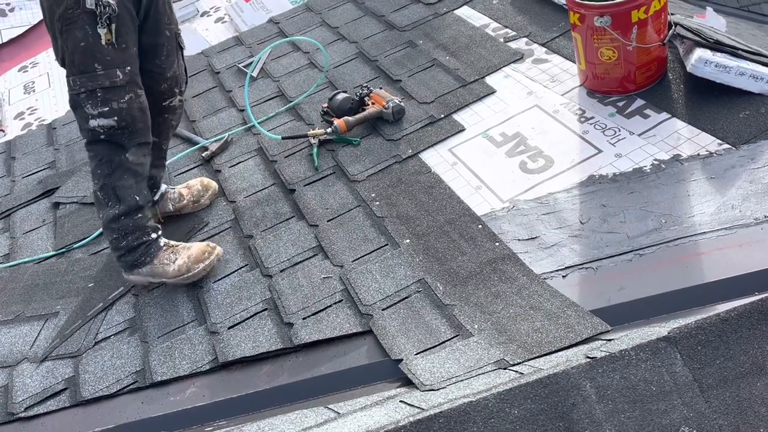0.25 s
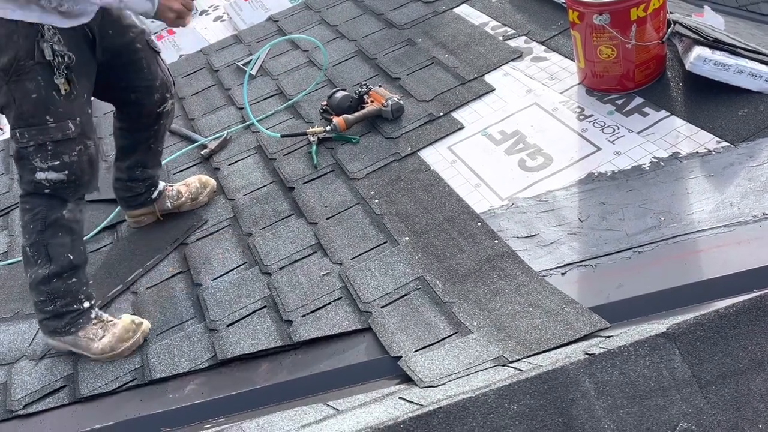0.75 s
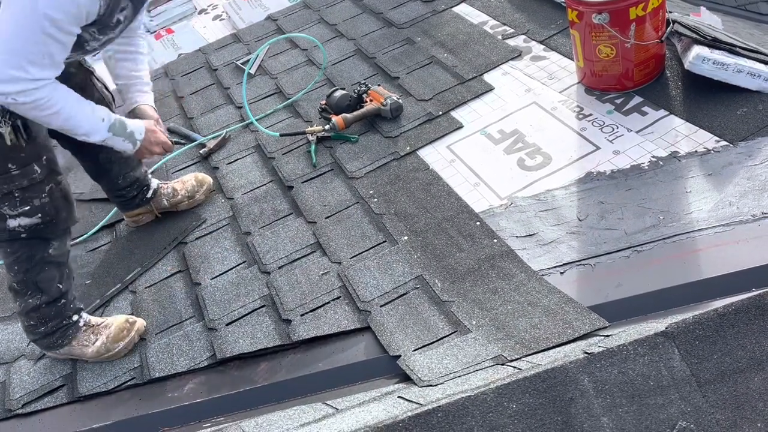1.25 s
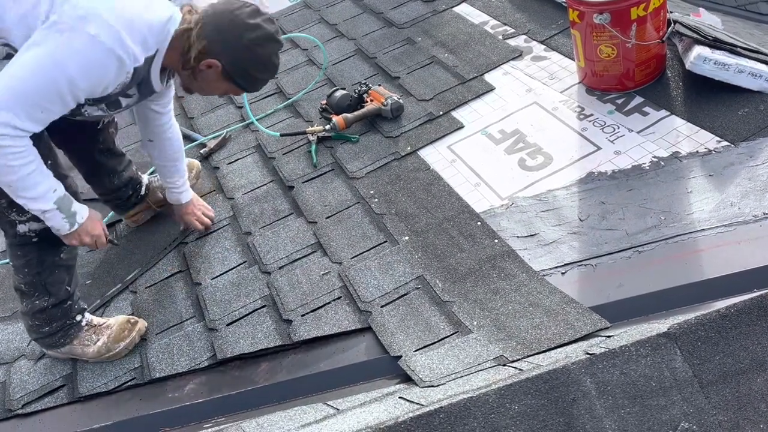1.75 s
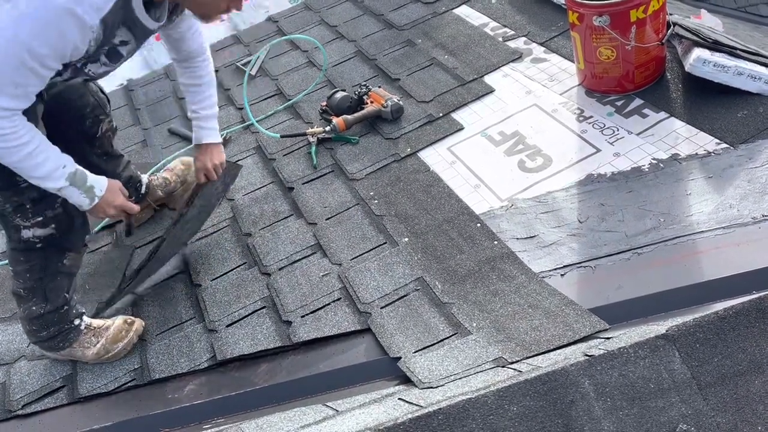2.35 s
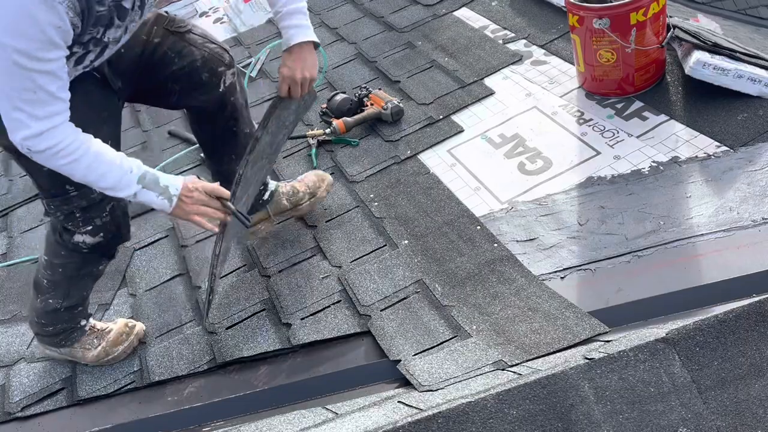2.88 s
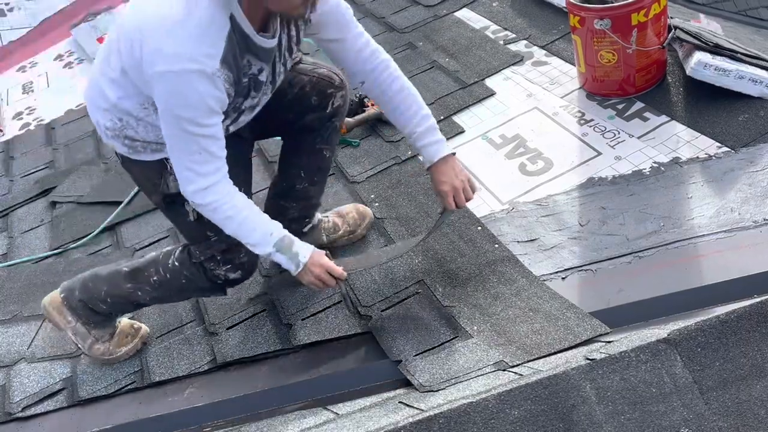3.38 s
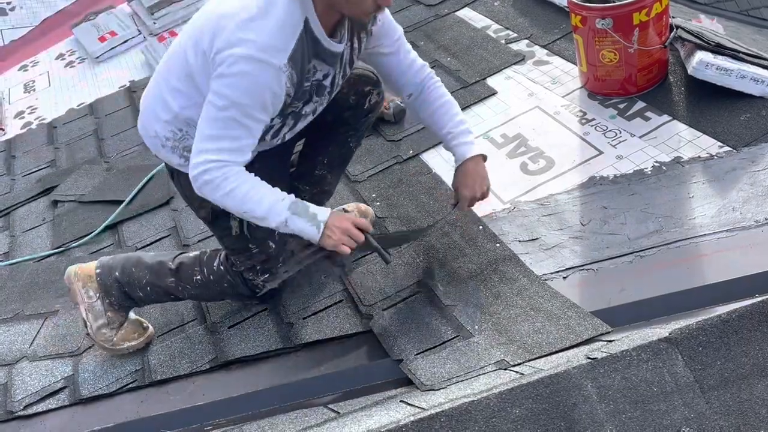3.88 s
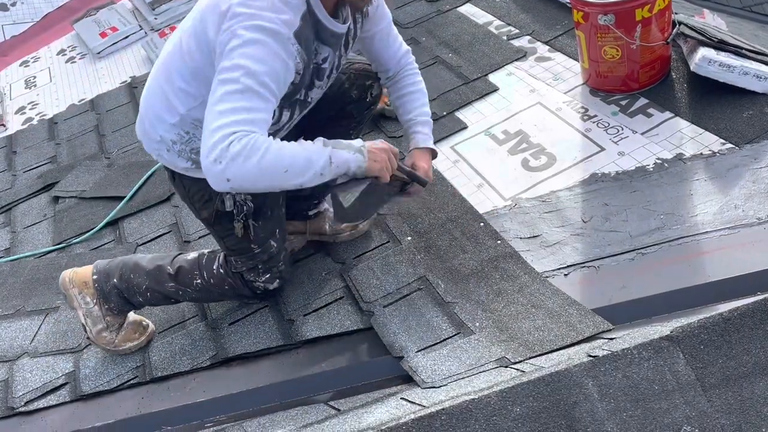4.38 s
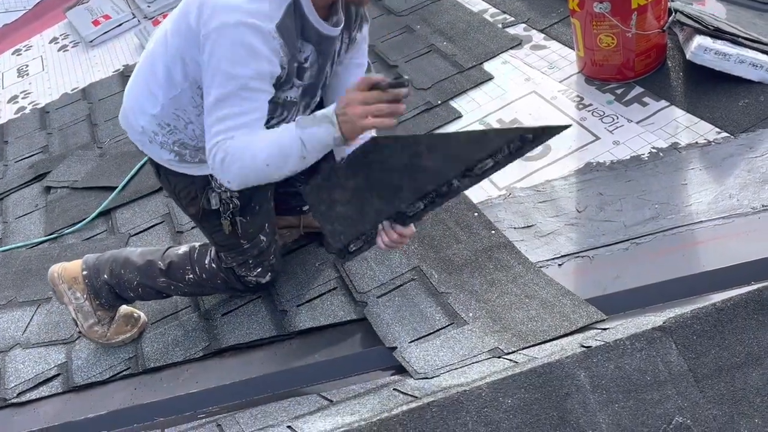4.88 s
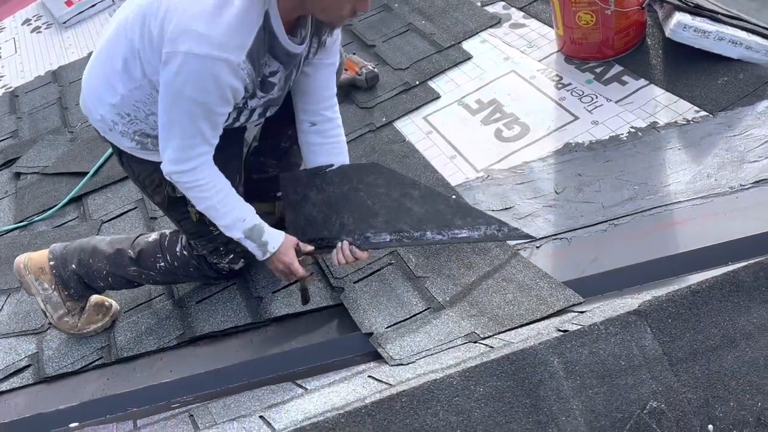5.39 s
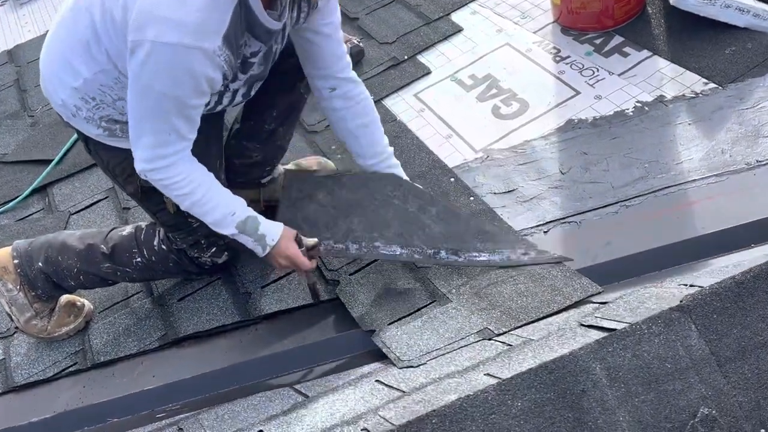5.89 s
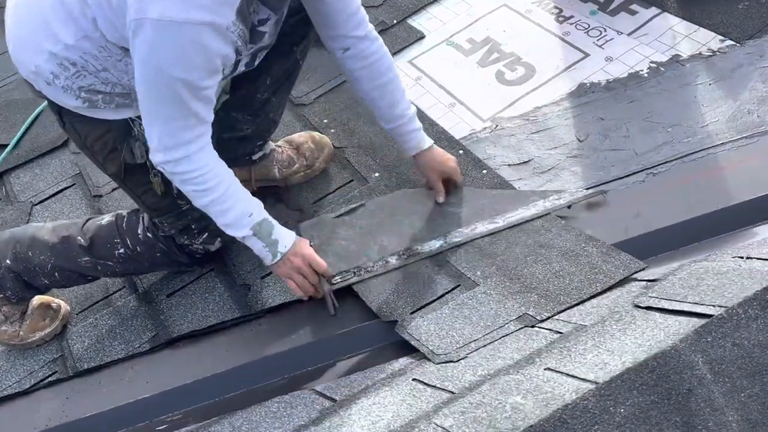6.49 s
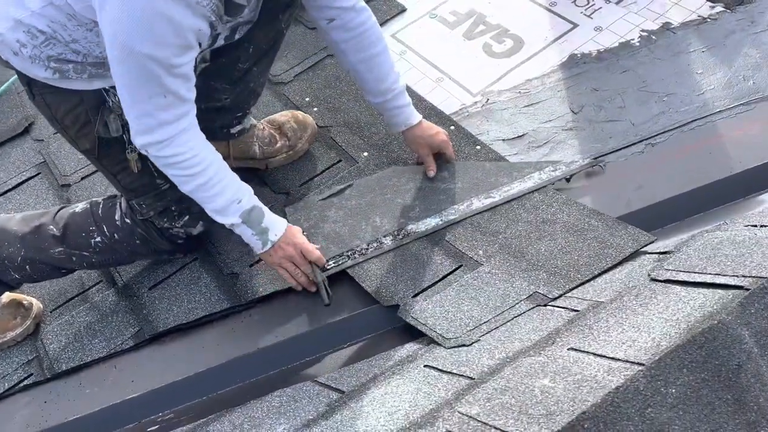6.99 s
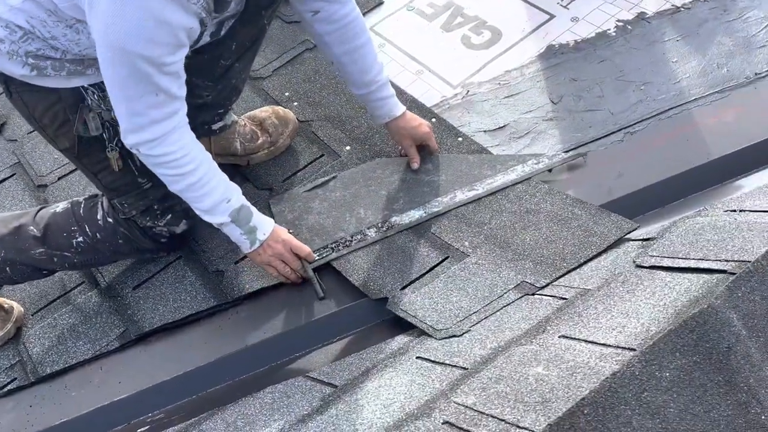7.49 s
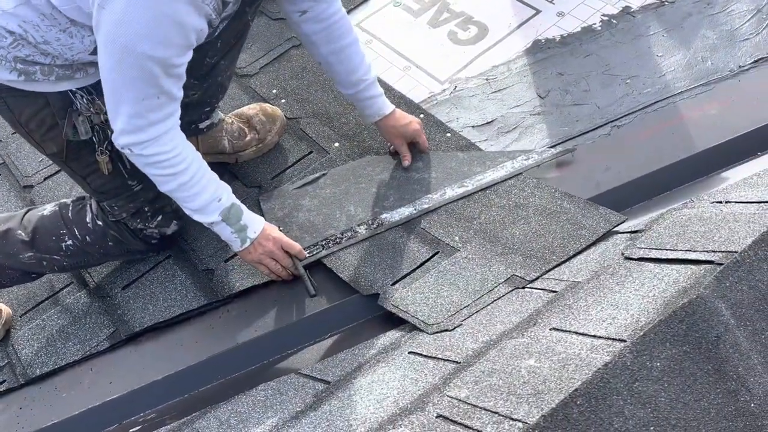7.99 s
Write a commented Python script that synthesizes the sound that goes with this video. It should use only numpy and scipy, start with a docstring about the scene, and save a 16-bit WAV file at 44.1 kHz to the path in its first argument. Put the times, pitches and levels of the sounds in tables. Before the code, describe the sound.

A pneumatic nailer fires six sharp, deck-ringing shots on a windy shingled roof, with air hisses, a brief knife rasp and gritty boot scuffs.

```python
"""Wind buffets a small stereo microphone on a shingled roof while a roofer shifts and scuffs close by.
Then a pneumatic nailer fires the first of six shots: clicks, blows that ring the deck, hissing air.
After the first shot a knife rasps through a shingle; boots, grit and wind go on between the later shots.
Struck things are ringing tones and short noise bursts; air, rubbing and wind are coloured noise.
At the end of the chain a gain control sinks after loud sounds and a limiter holds the peaks."""
import sys
import numpy as np
from scipy import signal
from scipy.fft import rfft, irfft
from scipy.io import wavfile
from scipy.ndimage import uniform_filter1d, minimum_filter1d

SR = 44100
rng = np.random.default_rng(int(sys.argv[2]) if len(sys.argv) > 2 else 0)


def store_pcm(level_fs):
    """Save levels as 16-bit WAV."""
    pcm = np.round(np.clip(level_fs, -1, 1) * 32767).astype(np.int16)
    wavfile.write(sys.argv[1], SR, np.atleast_2d(pcm).T)


N = 363825
TIME = np.arange(N) / SR  # s
BINS = np.fft.rfftfreq(N, 1 / SR)  # Hz

# Table levels are relative: each function adds its own gains. A t60 is the time to fade by 60 dB, in s.
# Two-row signals hold the part both microphone ports share, then the part in which they differ.


def from_db(db):
    """Decibels to gain."""
    return 10 ** (np.asarray(db) / 20)


def rms_one(x):
    """Scale to an rms of 1."""
    return x / np.sqrt(np.mean(x ** 2) + 1e-20)


def in_time(rows):
    """Join the points of each column by straight lines, giving a value at every sample."""
    s, *columns = np.transpose(rows)
    return [np.interp(TIME, s, column) for column in columns]


def over_bins(points):
    """Read a table along log frequency."""
    hz, value = np.transpose(points)
    return np.interp(np.log(BINS + 1), np.log(hz), value)


def noise(colour):
    """Two unrelated noises with the given spectrum: the shared part and the differing part."""
    white = rng.standard_normal((2, N))
    return rms_one(irfft(rfft(white) * from_db(over_bins(colour)), N))


def resonant(x, hz, width_hz):
    """Noise through one broad resonance, with an rms of 1."""
    b, a = signal.iirpeak(hz, hz / width_hz, fs=SR)
    return rms_one(signal.lfilter(b, a, x))


def flutter(rate_hz, depth_db):
    """A gain that wanders at random, with a mean power of 1."""
    slow = irfft(rfft(rng.standard_normal(N)) / (1 + (BINS / rate_hz) ** 2), N)
    return rms_one(from_db(depth_db * np.clip(rms_one(slow), -2, 2)))


def gritty(per_s, size_db, t60):
    """The gain of many tiny scratches of uneven size, with a mean power of 1."""
    born = rng.random(N) < per_s / SR
    sizes = from_db(size_db * np.minimum(rng.exponential(1, N), 4))
    power = fading(born * sizes ** 2, t60 / 2)
    return rms_one(np.sqrt(power))


def clicks(times, db):
    """One impulse per event."""
    out = np.zeros(N)
    np.add.at(out, np.round(times * SR).astype(int), from_db(db))
    return out


def fading(x, t60):
    """Every impulse becomes an exponential decay of its own height."""
    return signal.lfilter([1], [1, -from_db(-60 / (t60 * SR))], x + 1e-18)


def burst(x, t60, rise_t60):
    """A decay that takes a moment to swell."""
    return fading(x, t60) - fading(x, rise_t60)


def ring(x, hz, t60):
    """A unit impulse sets a decaying sine ringing, with a starting height of 1."""
    r = from_db(-60 / (t60 * SR))
    w = 2 * np.pi * hz / SR
    return signal.lfilter([0, r * np.sin(w)], [1, -2 * r * np.cos(w), r * r], x + 1e-18)


def swells(rows, fade_share, edge_db):
    """Summed power of events that swell and fade; fade_share of the length fades, ends lie edge_db down."""
    power = np.zeros(N)
    for s, db, length in rows:
        near = slice(*np.searchsorted(TIME, [s - 4 * length, s + 4 * length]))
        along = (TIME[near] - s) / length
        # after the peak the first slope counts, before it the second
        drop = np.maximum(along / fade_share, -along / (1 - fade_share))
        power[near] += from_db(db - edge_db * drop) ** 2
    return power


def nailer(gain_db=-2.5):
    """Trigger, blows, valve, exhaust and recoil add up, then scatter off the roofs and echo."""
    struck = blows() + struck_spots() + crush() + tool_ring()
    recoiling = recoil()
    shot = from_db(gain_db) * (trigger() + struck + valve() + exhaust() + recoiling)
    return shot + rooftops(shot) + house_echo(shot)


# piston, nail and nose strike, three or more blows a shot:
# t/s, level/dB, deck thump level/dB, steel crack level/dB, pitch the struck spot favours f/Hz
BLOWS = [(1.839, 2, 0, -1.5, 1088), (1.8475, -5.5, -1, 0.5, 1330), (1.855, -3, -8, -6, 1030),
         (2.753, -1, 7.5, 6.5, 573), (2.761, 4, -2, -0.5, 1684), (2.765, 8, -1, -2, 1853),
         (3.756, -3.5, 8, 5.5, 540), (3.7638, 5, -14.5, 1.5, 1287), (3.7682, 6.5, -5, -2, 1830),
         (4.981, -7.5, 6.5, 8, 350), (4.9891, 3, -3.5, -0.5, 807), (4.9941, 7, -9, -7.5, 1400),
         (6.9145, -2, 0, 6, 577), (6.9226, 0.5, -2.5, 6, 1370), (6.929, -4, -18, 3, 798),
         (6.939, -8, 4, -10.5, 706), (6.9527, -2, -8, -9, 790), (7.7961, 0, -1, 6, 880),
         (7.8045, -3, -5, 6, 560), (7.8086, 4, -15, -4, 1050)]
# spectrum of the rattling shingles: f/Hz, level/dB per Hz
KNOCK_COLOUR = [(50, -21.5), (150, 5.5), (300, -5.5), (550, 10.5), (900, 0.5), (1500, 10), (1900, -6),
                (3200, -13.5), (6000, -21.5), (16000, -53)]
# spectrum of steel on steel: f/Hz, level/dB per Hz
CRACK_COLOUR = [(300, -5), (1500, 4), (3000, 1.5), (5000, -2.5), (8000, -2), (11500, 0), (16000, -8.5)]


def blows(deck_db=-0.5, spot_db=2, spot_octaves=0.49, knock_db=-8, crack_db=-4.5):
    """Each blow rings the deck, rattles the shingles, and cracks steel on steel."""
    s, db, thump, crack, spot_hz = np.transpose(BLOWS)

    def strength_db(hz):
        low_thump = thump / (1 + (hz / 420) ** 4)
        favoured = spot_db * np.exp(-(np.log2(hz / spot_hz) / spot_octaves) ** 2)
        return db + deck_db + low_thump + favoured

    boom = deck(s, strength_db)
    knock = burst(clicks(s, db + knock_db), t60=0.028, rise_t60=0.0085) * noise(KNOCK_COLOUR)
    snap = burst(clicks(s, db + crack + crack_db), t60=0.017, rise_t60=0.0085) * noise(CRACK_COLOUR)
    return boom + (knock + snap) * gritty(per_s=2400, size_db=2.0, t60=0.0035)


def struck_spots(gain_db=-8, cycles=15):
    """The spot under the nose rings for a few cycles at its own pitch and gives each blow its hard core."""
    out, t = np.zeros((2, N)), TIME[:SR // 10]
    for s, db, _, _, hz in BLOWS:
        start = int(s * SR)
        fade = from_db(db + gain_db - 60 * hz * t / cycles)  # 60 dB down after that many cycles
        out[0, start:start + len(t)] += fade * np.sin(2 * np.pi * hz * t)
    return out


# spectrum of the crunching shingle: f/Hz, level/dB per Hz
CRUSH_COLOUR = [(300, -17), (900, 8), (1500, 11.5), (2200, 1.5), (3500, -5.5), (6000, -10.5), (9000, -25),
                (16000, -49)]


def crush(gain_db=-12, length_s=0.0052, edge_db=16):
    """Around each blow the shingle crunches, in a very short burst of noise."""
    rows = [(s + length_s / 6, db + gain_db, length_s) for s, db, *_ in BLOWS]
    return np.sqrt(swells(rows, 0.9, edge_db)) * noise(CRUSH_COLOUR)


# what the roof deck rings with: f/Hz, level/dB, t60/s
DECK = [(128, -33, 0.77), (124.3, -14.5, 0.2), (185.3, -11.5, 0.062), (260, -8.5, 0.054),
        (343.2, -10.5, 0.067), (448, -15.5, 0.051), (573, -15.5, 0.048), (681, -15.5, 0.039),
        (771, -18, 0.073), (869, -13, 0.026), (1074, -19.5, 0.027), (1218, -17.5, 0.037),
        (1350, -9.5, 0.021), (1690, -33, 0.029), (2370, -21, 0.023)]


def deck(times, strength_db, spread_db=3.0):
    """Blows ring the deck's modes; strength_db(hz) says how hard each blow drives a mode."""
    chance = rng.standard_normal((len(times), len(DECK)))
    out = np.zeros((2, N))
    for k, (hz, db, t60) in enumerate(DECK):
        struck = clicks(times, strength_db(hz) + db + spread_db * chance[:, k])
        mode = ring(struck, hz, t60)
        quarter_cycle = int(SR / hz / 4)
        # signs alternate, so each mode reaches the ports from its own direction
        out[0] += (-1) ** k * mode
        out[1] += (-1) ** (k // 2) * np.roll(mode, quarter_cycle)
    return out


# exhaust puffs: t/s, level/dB, time until the flow runs down t/s, low blast level/dB,
# centre of the port's hiss f/Hz, port hiss level/dB
EXHAUST = [(1.881, -23, 0.022, 1.5, 6900, -2), (2.77, -24, 0.0082, 6.5, 4000, 2),
           (2.837, -7.5, 0.019, -3, 5170, -9.5), (3.786, -19, 0.017, 1, 4900, -3.5),
           (5.009, -11, 0.014, -1, 4800, -7), (6.942, -10.5, 0.019, -2, 6370, -12),
           (7.82, -16.5, 0.016, -7, 6800, -5.5)]
# spectrum of the hissing jet: f/Hz, level/dB per Hz
VENT_COLOUR = [(200, -9), (700, -6.5), (1200, -9.5), (2000, -3), (3500, 1.5), (5000, -1.5), (7000, 0.5),
               (10000, 3), (13500, -.5), (16000, -12.5)]
# spectrum of the low blast: f/Hz, level/dB per Hz
BLAST_COLOUR = [(30, -18), (90, -1.5), (150, 1), (250, -3.5), (400, -25.5), (780, -22), (1100, -20),
                (3000, -48.5)]


def exhaust(opening_s=0.0061, emptying_t60=0.071, blast_t60=0.12, port_width_hz=1200):
    """The port opens and hisses, the cylinder blows out at full flow, then runs empty, sputtering."""
    out, t = np.zeros((2, N)), TIME[:SR // 3]
    jet, blast = noise(VENT_COLOUR), noise(BLAST_COLOUR)
    sputter = flutter(rate_hz=130, depth_db=1.7)
    for s, db, hold, low_db, port_hz, port_db in EXHAUST:
        puff = slice(int(s * SR), int(s * SR) + len(t))
        opened = from_db(db) * np.minimum(t / opening_s, 1)
        emptying = np.maximum(t - hold, 0)
        port = resonant(rng.standard_normal((2, len(t))), port_hz, port_width_hz)
        hiss = (jet[:, puff] + from_db(port_db) * port) * sputter[puff]
        hiss_fade = from_db(-60 * emptying / emptying_t60)
        blast_fade = from_db(low_db - 60 * emptying / blast_t60)
        out[:, puff] += opened * (hiss_fade * hiss + blast_fade * blast[:, puff])
    return out


# the piston returns and the tool bounces on the deck:
# t/s, level/dB, fall (negative) or rise towards the high modes in dB per octave
RECOIL = [(1.917, -12.5, -8), (2.869, -1, -1), (3.817, -15, -0.5), (5.037, -8, -1), (6.949, -8.5, 2.5),
          (7.822, 5.5, -31.5)]


def recoil():
    """Returning piston and bouncing tool bump the deck after each shot."""
    return thuds(RECOIL, gain_db=-3.0, slap_db=-5.5, slap_t60=0.042)


# spectrum of shingles slapped down: f/Hz, level/dB per Hz
THUD_COLOUR = [(80, -16), (200, 10.5), (330, 13.5), (650, 8.5), (900, -21), (1600, -34.5), (4000, -54)]


def thuds(rows, gain_db, slap_db, slap_t60):
    """Soft contacts reach mostly the deck's low modes; firmer ones also slap the shingles down."""
    s, db, fall_db = np.transpose(rows)
    slap = burst(clicks(s, db + fall_db + slap_db), slap_t60, slap_t60 / 6) * noise(THUD_COLOUR)
    return slap + deck(s, lambda hz: db + gain_db + fall_db * max(np.log2(hz / 250), 0))


# the main valve snaps shut before venting: t/s, level/dB
VALVE = [(1.875, -16), (2.8301, 1), (6.938, -5)]
# spectrum of the valve's snap: f/Hz, level/dB per Hz
VALVE_COLOUR = [(500, -22.5), (1500, -1.5), (2400, 3), (3500, -6.5), (5500, -8), (7500, -33.5),
                (16000, -33)]


def valve(gain_db=3):
    """A short bright snap of air."""
    s, db = np.transpose(VALVE)
    return burst(clicks(s, db + gain_db), t60=0.014, rise_t60=0.007) * noise(VALVE_COLOUR)


# what the nailer's metal body rings with: f/Hz, level/dB, t60/s
TOOL_BODY = [(2000, -48, .09), (2590, -39.5, 0.23), (3210, -28.5, 0.055), (3430, -35, 0.067),
             (4460, -31, 0.036), (12400, -54, 0.27), (12700, -51, 0.27)]


def tool_ring(blow_db=-5, valve_db=3, spread_db=3):
    """The blows and the closing valve set the nailer's body ringing."""
    hits = [(s, db + blow_db) for s, db, *_ in BLOWS] + [(s, db + valve_db) for s, db in VALVE]
    s, db = np.transpose(hits)
    chance = rng.standard_normal((len(s), len(TOOL_BODY)))
    out = np.zeros(N)
    for k, (hz, mode_db, t60) in enumerate(TOOL_BODY):
        out += ring(clicks(s, db + mode_db + spread_db * chance[:, k]), hz, t60)
    return np.array([out, np.roll(out, SR // 500)])  # the differing part comes 2 ms later


# the nose and the trigger click ahead of every shot: t/s, level/dB, treble level/dB relative to the click
TRIGGERS = [(1.8175, -22.5, -26), (1.826, -17.5, -9.5), (2.738, -18.5, -25), (2.743, -12.5, -25),
            (3.738, -28.5, -24), (3.7435, -16, -17), (4.963, -20.5, -31), (4.971, -17.5, -18),
            (6.902, -8.5, -6), (6.908, -26, -3), (7.7798, -14, -15), (7.786, -20.5, 8.5)]


def trigger():
    """Small hard clicks of the nose and the trigger."""
    return snaps(TRIGGERS, t60=0.03, treble_t60=0.03, body_db=-2.0, treble_db=-1.5, rise_t60=0.005)


# spectrum of a small hard contact: f/Hz, level/dB per Hz
CLICK_COLOUR = [(200, 10), (700, 13), (1500, 2.5), (2500, -3.5), (4500, -3.5), (7000, -20), (16000, -28.5)]
# spectrum of the treble in contacts and rubbing: f/Hz, level/dB per Hz
TREBLE_COLOUR = [(1000, -25.5), (4000, -17), (7000, 1), (12000, 3), (14000, -0.5), (16000, -13)]


def snaps(rows, t60, treble_t60, body_db, treble_db, rise_t60):
    """Small hard contacts: a short burst with a share of treble of its own."""
    s, db, bright_db = np.transpose(rows)[:3]
    body = burst(clicks(s, db + body_db), t60, rise_t60) * noise(CLICK_COLOUR)
    treble = burst(clicks(s, db + bright_db + treble_db), treble_t60, rise_t60) * noise(TREBLE_COLOUR)
    return body + treble


def through_paths(x, paths, dull_hz):
    """Send the shared part along many random paths that dull the treble."""
    lowpass = signal.butter(1, dull_hz, fs=SR, output="sos")
    return signal.fftconvolve(x[:1], signal.sosfilt(lowpass, paths), axes=1)[:, :N]


def rooftops(x, near_db=-17, near_t60=0.14, far_db=-33, far_t60=1.0):
    """Scatter from the roof planes close by, then a faint dull return from farther houses."""
    t = TIME[:SR // 2]
    near = from_db(near_db - 60 * t / near_t60) / np.sqrt(near_t60)
    far = from_db(far_db - 60 * t / far_t60) / np.sqrt(far_t60)
    unit_energy = np.sqrt(2 * np.log(1000) / SR)  # makes the levels independent of the fading times
    paths = rng.standard_normal((2, len(t))) * (near + far) * unit_energy * (t > .005)
    return through_paths(x, paths, dull_hz=3500)


def house_echo(x, delay_s=0.21, level_db=-36, spread_s=0.059):
    """A neighbouring house throws each shot back once, smeared and slightly dull."""
    t = TIME[:SR // 2]
    paths = rng.standard_normal((2, len(t))) * np.exp(-((t - delay_s) / spread_s) ** 2)
    paths = from_db(level_db) * rms_one(paths) / np.sqrt(len(t))
    return through_paths(x, paths, dull_hz=9000)


def roofer(rub_gain_db=3.5):
    """Granules grind under knife, boots and shingle, and now and then one snaps."""
    rub = from_db(rub_gain_db) * rubbing() * gritty(per_s=2900, size_db=1.0, t60=0.0037)
    return rub + knife() + bumps() + flexes() + scuffs() + grit()


# the knife is drawn through the shingle: t/s, level/dB, centre of the rasp f/Hz
KNIFE = [(2.01, -75, 4000), (2.059, -48, 4750), (2.111, -38, 4470), (2.167, -39.5, 2500),
         (2.192, -45.5, 2700), (2.228, -51.5, 3520), (2.244, -38, 4740), (2.27, -48, 3480),
         (2.289, -47.5, 2500), (2.31, -63, 2500), (2.34, -58, 2500)]
# spectrum of the scraping blade: f/Hz, level/dB per Hz
KNIFE_COLOUR = [(200, 9), (700, 7.5), (1500, 0.5), (2200, 7), (3200, -1.5), (5000, -8.5), (7000, -8),
                (12000, -9), (14000, -14), (16000, -35)]


def knife(gain_db=2.5, rasp_db=-3, rasp_width_hz=700, rasp_octaves=0.5):
    """The blade tears through granules, grain by grain; its rasp shifts in pitch along the stroke."""
    stroke = (TIME > KNIFE[0][0]) & (TIME < KNIFE[-1][0])
    db, centre_hz = np.array(in_time(KNIFE))[:, stroke]
    rasp = np.zeros((2, len(db)))
    # five fixed bands, each loudest while the moving centre is near it
    for hz in np.geomspace(2200, 5200, num=5):
        band = resonant(rng.standard_normal((2, SR)), hz, rasp_width_hz)[:, :len(db)]
        rasp += band * np.exp(-(np.log2(hz / centre_hz) / rasp_octaves) ** 2)
    grains = gritty(per_s=1200, size_db=2.4, t60=0.006)
    scrape = noise(KNIFE_COLOUR) * gritty(per_s=1500, size_db=2.0, t60=0.006)
    out = np.zeros((2, N))
    out[:, stroke] = from_db(db + gain_db) * (scrape[:, stroke] + from_db(rasp_db) * rasp * grains[stroke])
    return out


# boots and knees bump the deck: t/s, level/dB, fall (negative) or rise towards the high modes in dB per octave
BUMPS = [(.534, -19.5, -5.5), (1.057, -37.5, 6), (1.594, -21, -9.5), (1.952, -26.5, -1.5),
         (6.068, -30.5, -11), (7.243, -21, -4.5), (7.464, -19.5, -11.5), (7.599, -27, -3), (7.999, -34, 2)]


def bumps():
    """Boots and knees ring the deck and slap the shingles."""
    return thuds(BUMPS, gain_db=-2.5, slap_db=-2.0, slap_t60=0.034)


# grit snaps under boots and shingle: t/s, level/dB, treble level/dB relative to the snap, pitch f/Hz
GRIT = [(0.698, -27, -40, 4370), (0.7404, -32, -33, 900), (0.774, -34, -19, 5000),
        (0.7955, -32.5, -17, 4500), (0.8195, -38, -16, 5500), (0.8438, -33, -13, 5800),
        (0.979, -35.5, -38, 4540), (1.057, -21.5, -44, 960), (1.067, -28.5, -37, 2300),
        (1.3134, -42.5, -16, 5000), (1.3738, -40, -5, 6500), (1.3879, -31, -14, 2900),
        (1.952, -31.5, -40, 1200), (1.4344, -41.5, -13, 5500), (2.4693, -38, -20, 5000),
        (2.9174, -36, -15, 2600), (3.0884, -31, -13, 5000), (3.106, -48.5, -12, 4300),
        (3.129, -36.5, -18, 4400), (3.8554, -43, -24, 4960), (4.2825, -38.5, -26.5, 2740),
        (5.4417, -34, -15, 3930), (5.452, -35.5, -26, 3400), (5.4824, -38, -23, 3400),
        (5.662, -39.5, -10.5, 3700), (5.79, -44.5, -14, 4050), (6.368, -33, -23, 3650),
        (6.402, -36, -24, 3500), (6.4385, -26.5, -27, 1840), (6.446, -38, -24, 4170),
        (6.5071, -39, -34, 3440), (6.8134, -39.5, -25, 4000), (6.8424, -39, -22, 5200),
        (7.26, -44, -13, 6900), (7.998, -29, -36, 934)]


def grit(ring_db=-10, ring_t60=0.022, width_share=0.24):
    """Granules snap, each with a click and a brief ring at its own pitch."""
    rows = GRIT + loose_grit()
    out = snaps(rows, t60=0.048, treble_t60=0.018, body_db=-6.5, treble_db=6.5, rise_t60=0.0026)
    t = TIME[:SR // 10]
    for s, db, _, hz in rows:
        tone = resonant(rng.standard_normal((2, len(t))), hz, hz * width_share)
        tick = from_db(db + ring_db - 60 * t / ring_t60) * tone
        start = int(s * SR)
        out[:, start:start + len(t)] += tick[:, :N - start]
    return out


def loose_grit(count=6, db=-49, spread_db=3, treble_db=-16, pitch_hz=4000):
    """Stray granules snap faintly at random moments; the louder ones are lower in pitch."""
    when, size = rng.random((count, 2)).T
    rows = []
    for s, u in zip(when * TIME[-1], size):
        rows.append((s, db + spread_db * (2 * u - 1), treble_db, pitch_hz * 2 ** (.5 - u)))
    return rows


# boots, cloth and shingle rub on the granules:
# strongest moment t/s, level/dB, length t/s, treble level/dB relative to the stroke
RUBS = [(0.12, -56, 0.25, -25), (0.776, -55.5, 0.089, -8), (1.08, -55, 0.36, -19),
        (1.402, -56.5, 0.13, -19), (1.714, -53.5, 0.16, -27), (2.497, -57.5, 0.95, -18),
        (3.1, -71.5, 0.3, -13), (4.322, -74, 0.38, 4), (4.574, -70, 0.15, 10), (5.19, -64, 0.042, 0),
        (5.442, -53, 0.03, -11), (5.928, -55, 0.094, -8.5), (6.188, -57, 0.052, -3),
        (6.386, -54.5, 0.092, -15), (6.781, -58.5, 0.074, -13), (8.223, -57.5, 0.094, -21)]
# spectrum of the rasping granules: f/Hz, level/dB per Hz
RUB_COLOUR = [(400, -3), (1500, 13), (4000, 4.5), (6500, -1), (9000, -3.5), (13500, -9), (16000, -31.5)]


def rubbing(fade_share=0.25, edge_db=10, resting_db=-65):
    """Strokes rasp over a faint uneven rustle, each with its own share of thin treble swish."""
    resting = from_db(resting_db) * flutter(rate_hz=8.2, depth_db=2.0)
    strokes = [(s, db, length) for s, db, length, _ in RUBS]
    bright_strokes = [(s, db + bright_db, length) for s, db, length, bright_db in RUBS]
    rasp = swells(strokes, fade_share, edge_db) + resting ** 2
    swish = swells(bright_strokes, fade_share, edge_db)
    return np.sqrt(rasp) * noise(RUB_COLOUR) + np.sqrt(swish) * noise(TREBLE_COLOUR)


# soles and knees scuff dully over the shingles: strongest moment t/s, level/dB, length t/s
SCUFFS = [(.02, -38, 0.08), (.54, -45.5, .08), (.745, -41, 0.25), (1.6, -48, 0.083), (2.25, -36.5, 0.066),
          (5.305, -45, 0.087), (6.06, -49, .08), (7.52, -48, 0.072)]
# spectrum of a scuff: f/Hz, level/dB per Hz
SCUFF_COLOUR = [(120, -11.5), (350, 4), (900, 5), (1500, -11), (2400, -26), (8000, -53)]


def scuffs(fade_share=0.25, edge_db=10):
    """A dull, lumpy drag of rubber and cloth."""
    strokes = np.sqrt(swells(SCUFFS, fade_share, edge_db))
    return strokes * noise(SCUFF_COLOUR) * flutter(rate_hz=55, depth_db=5)


# a shingle or a board flexes with a short falling whump: t/s, level/dB, starting pitch f/Hz, length t/s
FLEXES = [(0.303, -28.5, 442, .018), (3.124, -23, 476, 0.022), (5.223, -25.5, 800, .009),
          (5.483, -51, 751, .014), (7.248, -31, 515, .014)]


def flexes(fall_octaves=1.7, unevenness=0.45):
    """A bending wave arrives high part first, so each flex tumbles down in a few uneven cycles."""
    out, t = np.zeros((2, N)), TIME[:SR // 8]
    for s, db, hz, length in FLEXES:
        along = t / length
        uneven = 1 + unevenness * rms_one(uniform_filter1d(rng.standard_normal(len(t)), size=40))
        pitch_hz = hz * uneven * 2 ** (-fall_octaves * np.minimum(along, 2))
        phase = 2 * np.pi * np.cumsum(pitch_hz) / SR
        swell = 2 * along * np.exp(1 - 2 * along)  # strongest halfway along
        start = int(s * SR)
        out[0, start:start + len(t)] += from_db(db) * swell * np.sin(phase)
    return out


# single eddies roll over the ports: strongest moment t/s, level/dB, length t/s, pitch at that moment f/Hz
EDDIES = [(0.553, -26, .04, 178.4), (0.781, -30.5, 0.046, 189), (0.876, -33, 0.034, 218.8),
          (0.978, -28, .025, 178.4), (1.443, -29, .03, 212), (1.457, -28, 0.059, 100.4),
          (1.606, -27.5, .05, 160), (2.012, -25, .025, 158.3), (3.228, -28.5, 0.056, 113.8),
          (5.172, -24.5, .025, 149.7), (5.222, -26, 0.052, 88.6), (6.087, -35, 0.046, 147.7),
          (6.4, -34, 0.041, 109.4), (7.255, -32.5, .04, 161.2), (7.57, -23, 0.045, 175.6),
          (7.685, -28, 0.027, 166.5), (8.136, -28, 0.047, 188)]


def passing_eddies(gain_db=1, sag_octaves=0.97, wobble=0.258):
    """Each eddy shakes the air at the ports for a few uneven cycles, slowing as it passes."""
    out = np.zeros((2, N))
    unsteady = 1 + wobble * rms_one(uniform_filter1d(rng.standard_normal(N), size=90))
    for (s, db, length, hz), turn in zip(EDDIES, rng.random(len(EDDIES))):
        near = np.abs(TIME - s) < 2 * length
        along = (TIME[near] - s) / length
        pitch_hz = hz * 2 ** (-sag_octaves * along) * unsteady[near]
        phase = 2 * np.pi * (turn + np.cumsum(pitch_hz) / SR)
        swell = from_db(db + gain_db) * np.exp(-(2 * along) ** 2)
        out[:, near] += swell * np.array([np.sin(phase), np.cos(phase)])
    return out


# the breeze on the microphone, rising and lulling between the gusts: t/s, level/dB
WIND = [(0.0, -38), (0.3, -58.5), (0.55, -34.5), (1.1, -46), (1.51, -45), (1.98, -38), (2.3, -42),
        (4.57, -41.5), (5.19, -43), (5.42, -42.5), (5.72, -45), (6.23, -46), (6.5, -63), (6.71, -47.5),
        (6.92, -40.5), (7.35, -49), (7.79, -38.5), (8.25, -37)]
# single gusts thump the microphone: strongest moment t/s, level/dB, length t/s
GUSTS = [(.39, -30, 0.22), (.56, -37, 0.11), (.74, -29.5, 0.1), (1.35, -33, 0.18), (1.61, -27, 0.15),
         (2.055, -25.5, 0.07), (2.47, -31.5, 0.19), (3.22, -33.5, 0.1), (3.46, -33.5, 0.18),
         (4.25, -28.5, 0.045), (4.57, -34, 0.11), (4.76, -35.5, 0.24), (5.16, -28, 0.31), (5.92, -29, 0.1),
         (6.07, -28, 0.15), (6.29, -29, 0.3), (6.39, -25, 0.08), (7.57, -28.5, 0.088), (7.71, -32.5, 0.057),
         (8.06, -31, 0.11)]
# the rush of the open air: t/s, level/dB
AIR = [(0.0, -49), (2.64, -51.5), (3.1, -59), (5.38, -58.5), (5.49, -59.5), (7.74, -51), (7.86, -55),
       (8.25, -53)]
# spectrum of the buffets: f/Hz, level/dB per Hz
WIND_COLOUR = [(20, -39.5), (35, -16.5), (55, 5.5), (90, 3.5), (135, -3), (200, -9.5), (300, -28),
               (600, -36), (1500, -70.5)]
# spectrum of the smaller eddies: f/Hz, level/dB per Hz
EDDY_COLOUR = [(80, -4), (180, 14), (300, 2), (500, -8), (800, -15), (2000, -58)]
# spectrum of the open air: f/Hz, level/dB per Hz
AIR_COLOUR = [(30, -15), (120, 6), (350, 4), (600, -1), (1000, -4), (1550, -9.5), (1750, -16.5),
              (3000, -21), (4200, -23), (7000, -34.5), (12000, -60), (14000, -64.5), (15000, -87)]


def wind(breeze_gain_db=3, gust_fade_share=0.59, gust_edge_db=11, air_gain_db=9.0, still_air_db=-56,
         eddy_db=-45, eddy_growth=1.41, usual_wind_db=-34):
    """Gusts thud on the ports and shed smaller eddies as they grow, over the smooth rush of the open air."""
    breeze_db, = in_time(WIND)
    air_db, = in_time(AIR)
    gust_power = swells(GUSTS, gust_fade_share, gust_edge_db)
    force = np.sqrt(from_db(breeze_db + breeze_gain_db) ** 2 + gust_power)
    buffets = force * noise(WIND_COLOUR) * flutter(rate_hz=38, depth_db=3.0)
    # eddies grow faster than the force of the wind
    eddy_gain = from_db(eddy_db) * (force / from_db(usual_wind_db)) ** eddy_growth
    eddies = eddy_gain * noise(EDDY_COLOUR) * flutter(rate_hz=3.7, depth_db=6.5)
    rush = np.hypot(from_db(air_db + air_gain_db), from_db(still_air_db))
    return buffets + eddies + rush * noise(AIR_COLOUR) * flutter(rate_hz=22, depth_db=1.6)


def ports(x, likeness, phase, balance):
    """Shared and differing parts become left and right, set against each other in phase and level."""
    alike = np.clip(over_bins(likeness), 0, 1)
    shared, differing = rfft(x) * np.sqrt([(1 + alike) / 2, (1 - alike) / 2])
    sides = np.array([[1], [-1]])  # left, right
    lead = np.exp(.5j * sides * over_bins(phase))
    level = from_db(sides * over_bins(balance) / 2)
    return irfft((shared + sides * differing) * lead * level, N)


# how alike left and right are: f/Hz, likeness (0 to 1)
NAILER_LIKENESS = [(300, .96), (700, .8), (1300, .82), (2300, .88), (4500, .72), (5300, .4), (6200, .72),
                   (7400, .75), (8300, .99), (10000, .75), (11800, 1), (13000, .97), (13800, .65),
                   (15000, .96)]
ROOFER_LIKENESS = [(300, .8), (1000, 0.2), (2000, 0.77), (3700, .62), (4800, 0.51), (7000, 1), (8500, 1),
                   (10000, 0.86), (11800, 1), (13500, .65)]
WIND_LIKENESS = [(70, 0.83), (300, 0.52), (900, .05), (2200, 0.6), (5300, .45), (8000, 1), (10000, .75),
                 (12000, .98)]
# phase by which the left channel leads, the treble being the same for every source: f/Hz, phase/radians
TREBLE_PHASE = [(5600, -.8), (6700, -1.0), (8200, -3.1), (8900, -3.4), (11300, -6.15), (12800, -6.4),
                (14800, -9.4)]
NAILER_PHASE = [(100, -.3), (350, -.55), (800, -1.2), (1600, -2.3), (1750, -.25), (3000, .8),
                (4900, .9)] + TREBLE_PHASE
ROOFER_PHASE = [(400, .1), (1000, 1.4), (1550, 3), (1700, 0), (3500, 1.8), (4000, .1)] + TREBLE_PHASE
WIND_PHASE = [(800, 0), (1100, -2.7), (1600, -2.7), (1750, .2), (3000, 1), (4700, .4)] + TREBLE_PHASE
# left minus right: f/Hz, level/dB
NAILER_BALANCE = [(200, -.5), (370, 1), (700, -2.5), (1000, -3.5), (1550, -3.7), (1800, 2.7), (3700, 2),
                  (4500, -.3)]
ROOFER_BALANCE = [(500, 0), (950, 2), (1500, -3), (2200, 2), (3000, 4), (3600, 8), (4400, 2), (6000, 0)]
WIND_BALANCE = [(500, .3), (1100, -1.3), (1550, -3.6), (1800, 2), (4500, 2.5), (7000, 0)]


def scene():
    """The nailer, the roofer and the wind at the microphone, whose two ports hear each differently."""
    return (ports(nailer(), NAILER_LIKENESS, NAILER_PHASE, NAILER_BALANCE)
            + ports(roofer(), ROOFER_LIKENESS, ROOFER_PHASE, ROOFER_BALANCE)
            + ports(wind() + passing_eddies(), WIND_LIKENESS, WIND_PHASE, WIND_BALANCE))


def held_peaks(over_db, release_db_per_s):
    """Follow rises at once and fall back at a steady rate."""
    slope = release_db_per_s * TIME
    return np.maximum.accumulate(over_db + slope) - slope


def gain_control(x, threshold_db=-22, share=0.25, attack_s=0.17, release_db_per_s=25):
    """A slow gain control sinks after each loud sound and recovers."""
    power = np.abs(uniform_filter1d(np.mean(x ** 2, axis=0), size=441))  # 10 ms average
    level_db = 10 * np.log10(power + 1e-12)
    over_db = share * np.maximum(level_db - threshold_db, 0)
    r = np.exp(-1 / (attack_s * SR))
    cut_db = signal.lfilter([1 - r], [1, -r], held_peaks(over_db, release_db_per_s))
    return x * from_db(-cut_db)


def record(dry, ceiling_db=-1.2, release_db_per_s=40, cutoff_hz=16000):
    """After the gain control a look-ahead limiter holds the peaks and lets go slowly; the top is cut."""
    dry = gain_control(dry)
    peak_db = 20 * np.log10(np.abs(dry).max(axis=0) + 1e-9)
    held = held_peaks(np.maximum(peak_db - ceiling_db, 0), release_db_per_s)
    gain_db = uniform_filter1d(minimum_filter1d(-held, size=65), size=65)  # looks ahead, then smooths
    lowpass = signal.ellip(10, .2, 80, cutoff_hz, fs=SR, output="sos")
    return signal.sosfilt(lowpass, dry * from_db(gain_db))


dry = scene()
out = record(dry)
store_pcm(out)
```